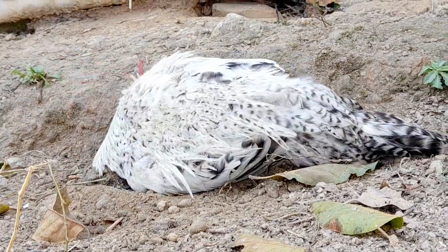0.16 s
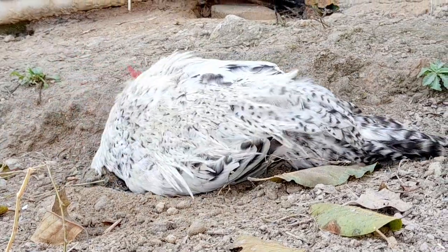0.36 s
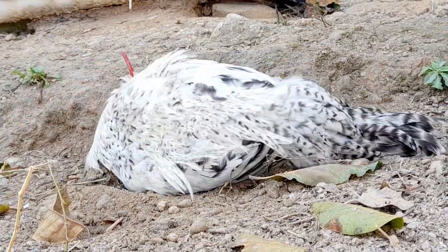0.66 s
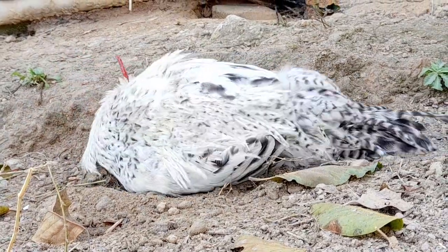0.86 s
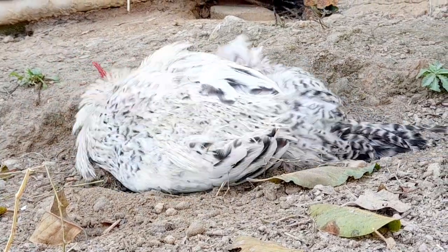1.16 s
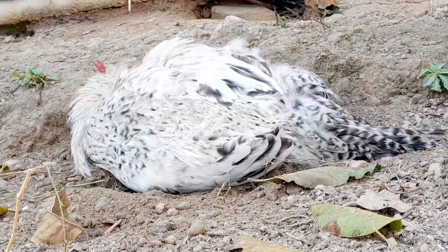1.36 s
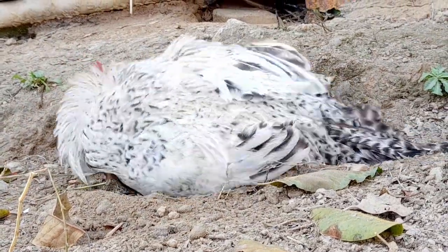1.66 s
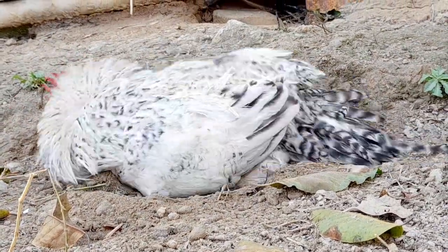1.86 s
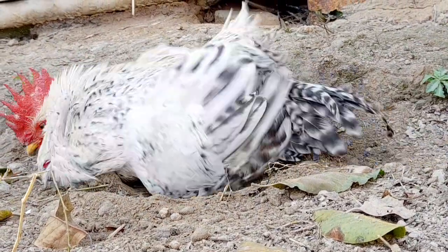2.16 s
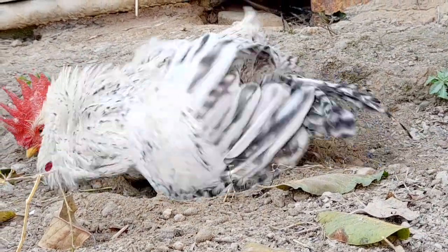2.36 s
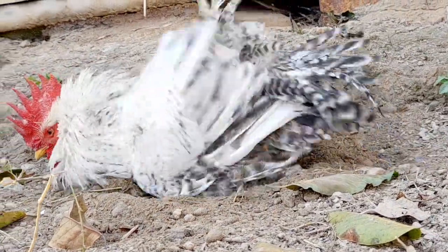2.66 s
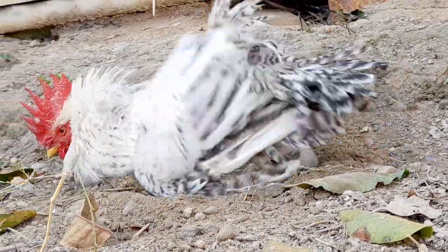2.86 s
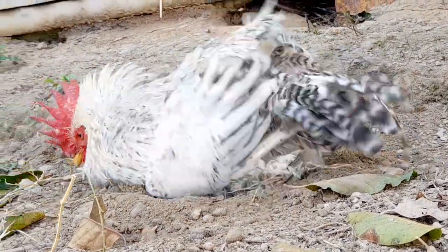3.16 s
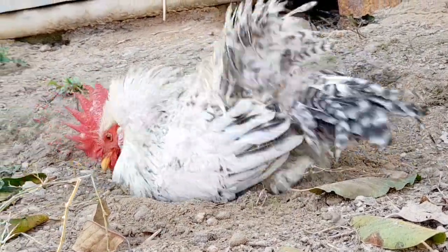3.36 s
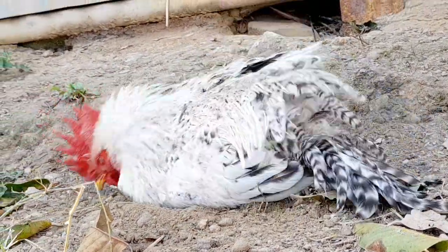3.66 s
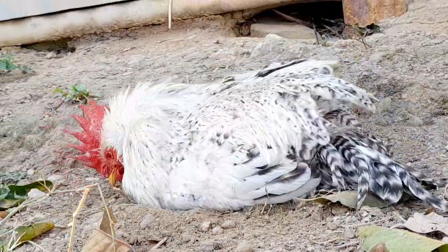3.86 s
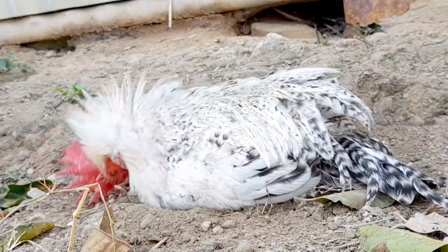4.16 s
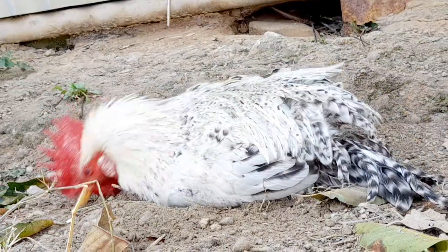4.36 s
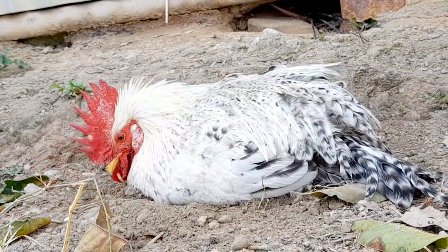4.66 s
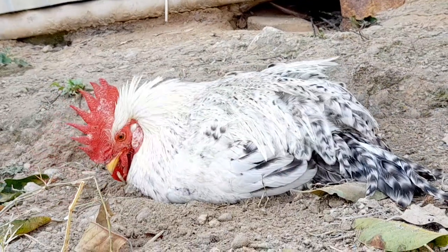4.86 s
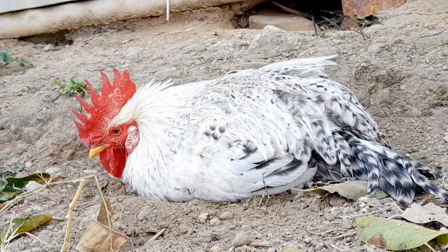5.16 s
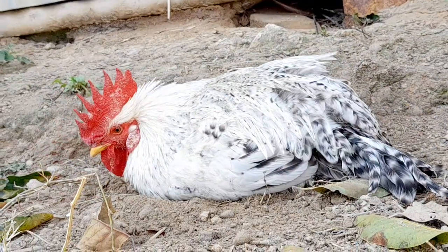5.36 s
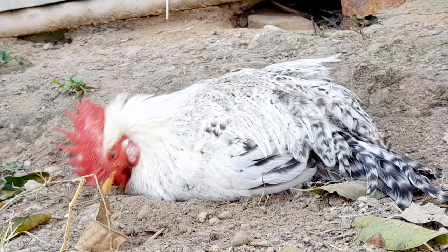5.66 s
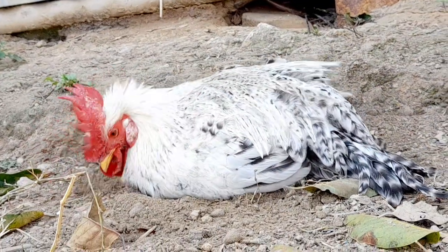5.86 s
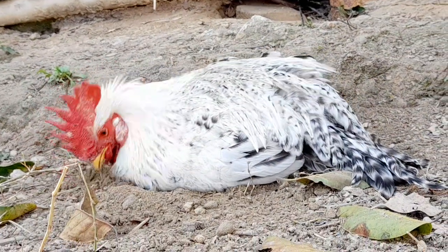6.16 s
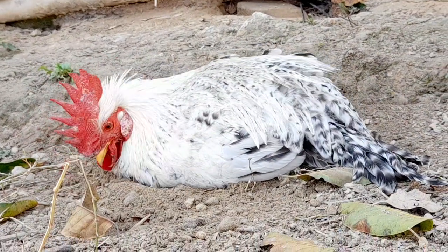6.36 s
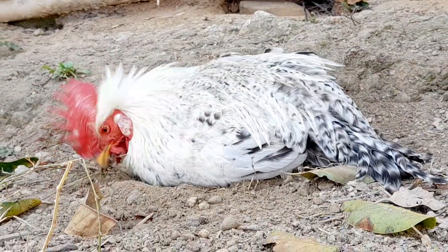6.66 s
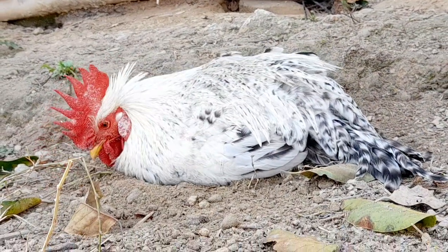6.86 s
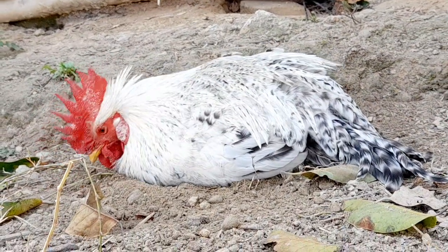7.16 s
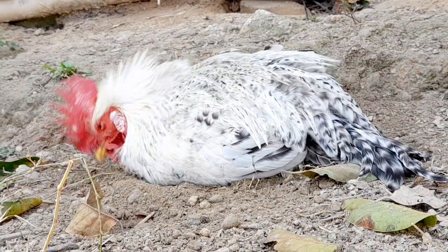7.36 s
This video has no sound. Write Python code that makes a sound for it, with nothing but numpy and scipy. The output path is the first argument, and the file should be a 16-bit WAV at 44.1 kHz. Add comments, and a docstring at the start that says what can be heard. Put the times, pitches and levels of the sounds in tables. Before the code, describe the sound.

Outdoors in a yard, wind softly buffets the left side of the microphone while small birds cheep on the right. Around two seconds a rooster rattles its stiff feathers, scrapes dry soil and sprays sand, then shudders again. Crumbs and grit patter down and settle. Hoarse scolding and lively cheeping continue, with distant whistles and faint hens over a low rumble.

```python
"""A low outdoor rumble and faint hiss, a breeze buffeting the left microphone port, and bird calls around.
Birds whistle and hens call far off; small birds cheep and scold to the right, in front of a wall.
A rooster takes a dust bath: he shudders his wings and kicks dry soil over himself, and crumbs patter down.
Calls are harmonics on gliding pitches; wind, soil and sand are filtered noise and clicks under envelopes,
and the feathers are resonances driven by flicks and rubbing noise."""
import sys
import numpy as np
from scipy import signal
from scipy.fft import rfft, irfft
from scipy.io import wavfile
from scipy.ndimage import map_coordinates

SR = 44100
rng = np.random.default_rng(int(sys.argv[2]) if len(sys.argv) > 2 else 0)


def store_pcm(level_fs):
    """Save levels as 16-bit WAV."""
    pcm = np.round(np.clip(level_fs, -1, 1) * 32767).astype(np.int16)
    wavfile.write(sys.argv[1], SR, np.atleast_2d(pcm).T)


N = 330750  # samples, 7.5 s
T = np.arange(N) / SR  # s


def undb(db):
    """Decibels to gain."""
    return 10 ** (np.asarray(db) / 20)


def unit(x):
    """Scale to rms 1."""
    return x / np.sqrt(np.mean(x ** 2) + 1e-18)


def pan(x, db):
    """Place a sound by its left minus right level, keeping the mean power."""
    return unit(undb([[db / 2], [-db / 2]])) * x


def add(out, s, x):
    """Mix x into out from time s."""
    i = int(s * SR)
    out[..., i:i + x.shape[-1]] += x[..., :N - i]


def shape(x, points):
    """Filter by a spectrum of (f/Hz, level/dB), interpolated over log frequency."""
    hz, db = np.transpose(points)
    f = np.maximum(np.fft.rfftfreq(N, 1 / SR), 1)
    return irfft(rfft(x) * undb(np.interp(np.log(f), np.log(hz), db)), N)


def colour(x, points):
    """Filter by a spectrum of (f/Hz, level/dB), then scale to rms 1."""
    return unit(shape(x, points))


def ring(x, hz, width):
    """One resonance, gain 1 at its centre."""
    return signal.lfilter(*signal.iirpeak(hz, hz / width, SR), x)


def wander(n, rate):
    """Smooth chance with spread near 1 that changes rate times a second."""
    at = np.arange(n) * rate / SR
    return map_coordinates(rng.standard_normal(4096), [at], order=2, mode="wrap")


def grains(rate, spread_db):
    """Random clicks of very unequal size, rate of them a second on average."""
    chance = rng.random(N)
    size = np.minimum(rng.exponential(size=N), 5)
    sign = rng.standard_normal(N)
    return (chance < rate / SR) * undb(spread_db * size) * sign


def envelope(s, length, attack_s, release_s):
    """Rises from time s, holds until its length is over, then dies away."""
    rise = np.clip((T - s) / attack_s, 0, 1)
    return rise * np.exp(-np.maximum(T - s - length, 0) / release_s)


def contour(length, values):
    """A smooth line through values spread evenly over a note."""
    at = np.linspace(0, len(values) - 1, int(length * SR))
    return map_coordinates(np.array(values, float), [at], order=2, mode="nearest")


def voice(hz, partials_db, jitter, jitter_hz):
    """Harmonics of a pitch contour that trembles at random; rms 1."""
    phase = 2 * np.pi * np.cumsum(hz * (1 + jitter * wander(len(hz), jitter_hz))) / SR
    # harmonics above half the sample rate stay silent
    return unit(sum(undb(db) * np.sin(k * phase) * (k * hz < SR / 2) for k, db in enumerate(partials_db, 1)))


def slurs(rows, partials_db, jitter, jitter_hz):
    """Soft calls that glide from one pitch to another."""
    out = np.zeros(N)
    for s, length, start_hz, end_hz, db in rows:
        note = voice(contour(length, [start_hz, end_hz]), partials_db, jitter, jitter_hz)
        add(out, s, note * contour(length, [0.068, 0.95, 0.77, 0.89, 0.059]) * undb(db))
    return out


def yard_echo(x, early_db, early_t60, late_db, late_t60):
    """Ground and wall scatter the sound at once; buildings add a faint tail, unlike at each port."""
    t = T[:SR // 2]
    early, late = rng.standard_normal((2, 2, len(t))) * (t > .002)
    tails = [early * undb(-60 * t / early_t60), late * undb(-60 * t / late_t60)]
    response = sum(undb(db) * h / np.linalg.norm(h, axis=1, keepdims=True)
                   for db, h in zip((early_db, late_db), tails))
    return signal.fftconvolve(x, response, axes=1)[:, :N]


# spectra of the open air: (f/Hz, relative level/dB per Hz)
RUMBLE = [(25, -42), (42, -6), (59, -4.5), (85, -1.5), (140, -0.5), (200, -1), (285, -0.5), (340, -12),
          (480, -17), (750, -23.5), (1000, -24.5), (1400, -50), (2200, -61.5)]
HISS = [(500, 8.5), (1000, 4), (1500, 4.5), (2400, 7), (3200, 4), (4100, 5), (5200, 1), (6300, -0.5),
        (8000, -15), (10000, -9), (13500, -11), (15500, -14)]
# slow swell of the rumble: (t/s, level/dB before the rumble gain)
SWELL = [(3.3, -58.5), (4.25, -55), (4.61, -57.5), (4.77, -57), (5.18, -58.5), (5.62, -55), (6.24, -61),
         (7.1, -56)]


def outdoors(rumble_db=3, hiss_db=-64.0, waver_db=1):
    """Far rumble, nearly alike at both ports, swells and wavers under a faint diffuse hiss."""
    rumble = colour(rng.standard_normal(N) + 0.41 * rng.standard_normal((2, N)), RUMBLE)
    hiss = colour(rng.standard_normal((2, N)), HISS)
    swell_db = np.interp(T, *np.transpose(SWELL)) + waver_db * wander(N, 12)
    return undb(rumble_db + swell_db) * rumble + undb(hiss_db + wander(N, 12)) * hiss


# spectrum of wind on a port: (f/Hz, relative level/dB per Hz)
BUFFET = [(20, -40), (36, -6), (55, 5), (110, 1.5), (190, -12), (280, -30.5), (500, -30), (1200, -39),
          (4000, -58)]
# spells of breeze: (t/s, length/s, level/dB before the breeze gain)
BREEZES = [(0.038, 1.98, -54.5), (7.137, 0.46, -58.5)]
BREEZE_ATTACK_S, BREEZE_RELEASE_S, TURBULENCE_DB, TURBULENCE_HZ = .08, 0.22, 4.5, 16
# gusts that thump on the port: (t/s, length/s, level/dB before the gust gain, eddy f/Hz)
GUSTS = [(.212, 0.027, -37.5, 117), (0.27, 0.27, -50.5, 86), (0.833, 0.055, -48, 72),
         (0.92, 0.17, -41, 186), (1.295, 0.021, -39.5, 80), (1.412, 0.11, -49, 80),
         (1.575, 0.024, -42, 133), (1.645, 0.037, -44.5, 68), (1.898, 0.03, -36.5, 85),
         (2.372, 0.039, -48, 60), (2.48, 0.11, -51, 65), (7.357, 0.025, -53, 55),
         (7.46, 0.049, -45.5, 55.5)]
GUST_ATTACK_S, GUST_RELEASE_S = 0.017, 0.012


def wind(breeze_db=4, gust_db=2, pan_db=20, eddy_db=-2):
    """Turbulence thumps on the left port, barely on the right; gusts shed eddies, each port has its own swirl."""
    buffet = colour(rng.standard_normal((2, N)), BUFFET)
    breeze = sum(undb(db) * envelope(s, length, BREEZE_ATTACK_S, BREEZE_RELEASE_S) for s, length, db in BREEZES)
    out = undb(breeze_db + TURBULENCE_DB * wander(N, TURBULENCE_HZ)) * breeze * buffet
    swirl = rng.standard_normal((2, N))
    for s, length, db, hz in GUSTS:
        eddy = undb(eddy_db) * unit(ring(ring(swirl, hz, 51), hz, 82))
        gust = undb(db + gust_db) * envelope(s, length, GUST_ATTACK_S, GUST_RELEASE_S)
        out += gust * (buffet + eddy)
    return pan(out, pan_db)


def flock(level_db=-70, spread_db=3, count=45):
    """More birds twitter faintly in the distance, at random times and pitches, to the right."""
    rows = [(a * T[-1], 0.043 * (1 + b), 3300 + 2200 * c, 3300 + 1800 * d, level_db + spread_db * (2 * e - 1))
            for a, b, c, d, e in rng.random((count, 5))]
    return pan(slurs(rows, [0], 0.041, 1120), -20)


# distant hens: (t/s, length/s, start f/Hz, end f/Hz, level/dB relative to each other)
HENS = [(5.48, 0.14, 248.3, 284.5, -63.5), (5.5, 0.23, 256.6, 247.5, -68.5), (6.57, 0.23, 305, 285.5, -70),
        (7.24, 0.3, 344.3, 399.7, -67.5), (7.32, 0.2, 425, 460, -64.5)]
# the throat of a hen: (f/Hz, relative level/dB)
THROAT = [(200, -40), (420, 12), (560, 6), (760, 8.5), (860, -8), (1000, -3), (1300, -15), (1700, -1),
          (2300, -41), (4000, -62)]


def hens(level_db=-74):
    """Hoarse drawn-out calls, shaped by the throat."""
    calls = slurs(HENS, [0] * 7, 0.038, 200.7)
    return pan(undb(level_db) * colour(calls, THROAT), 0.64)


# slurred whistles of birds further off: (t/s, length/s, start f/Hz, end f/Hz, level/dB before far mix)
WHISTLES = [(.095, 0.036, 3040, 2500, -58.5), (.185, 0.039, 3130, 2320, -56),
            (.25, 0.037, 2320, 2750, -57.5), (.305, .04, 2580, 3020, -58.5), (.38, 0.035, 3100, 2390, -68),
            (.55, 0.049, 2264, 2490, -65), (.85, 0.19, 1060, 1036, -71), (2.14, 0.057, 2310, 2610, -52),
            (2.412, 0.076, 2896, 2163, -49.5), (2.455, .05, 4030, 3840, -54.5),
            (3.13, 0.052, 4150, 4460, -60.5), (3.685, 0.033, 3820, 4570, -59),
            (4.48, 0.039, 4340, 3940, -60.5), (4.53, 0.026, 3770, 4300, -61), (4.5, 0.078, 2350, 2234, -66),
            (4.66, 0.084, 2150, 2245, -66), (4.93, 0.12, 1332, 1326, -71),
            (5.095, 0.042, 2600, 2375, -56.5), (5.15, 0.094, 2234, 2604, -63.5),
            (6.29, 0.13, 2400, 2020, -70), (6.51, 0.032, 3560, 4690, -55.5), (6.98, 0.016, 3420, 4370, -52),
            (7.403, 0.046, 3860, 4780, -57)]


def whistles():
    """Gliding, nearly pure tones with a weak octave."""
    return pan(slurs(WHISTLES, [0, -28], 0.0365, 903), -2.6)


# thin arched peeps: (t/s, length/s, level/dB before gain)
PEEPS = [(0.058, 0.075, -47.5), (0.279, 0.05, -47), (1.253, 0.076, -45.5), (1.668, 0.084, -48),
         (2.355, 0.067, -49), (3.956, 0.062, -43), (6.404, 0.072, -51), (6.887, 0.07, -45),
         (7.309, 0.072, -52.5)]


def peeps(gain_db=-3, pan_db=-8, jitter=0.074):
    """Notes that climb and sink; a faint octave sounds at the onset and again later, strongest as they sink."""
    out = np.zeros(N)
    for s, length, db in PEEPS:
        pitch = contour(length, [3500, 3900, 5430, 5620, 5230, 4420])
        low = voice(pitch, [0], jitter, 1500)
        octave = voice(pitch, [-60, 0], jitter / 2, 1500)
        note = low * contour(length, [0.23, 1.0, 0.96, 0.31, 0.35, 0.24, 1])
        note += octave * contour(length, [0.12, 0.0, 0.065, 0.14, 0.16, 0.22, 0.0])
        add(out, s, note * undb(db + gain_db))
    return pan(out, pan_db)


def far_calls(direct_db=-5):
    """Peeps, twitter, whistles and hens, with more echo than direct sound."""
    calls = peeps() + flock() + whistles() + hens()
    return undb(direct_db) * calls + yard_echo(calls, early_db=4.5, early_t60=0.17, late_db=-2, late_t60=0.6)


# short scolding rasps: (t/s, length/s, f/Hz, level/dB before gain)
RASPS = [(1.609, .032, 4190, -53.5), (2.558, 0.016, 3390, -48), (2.618, 0.017, 3097, -39),
         (2.694, 0.025, 2986, -39), (3.647, 0.041, 4840, -52), (3.701, 0.045, 4460, -52),
         (3.757, 0.04, 4530, -48), (3.825, 0.028, 4650, -48), (3.899, 0.046, 4690, -48),
         (4.057, 0.049, 4660, -43.5), (4.231, 0.035, 4700, -47.5), (4.306, 0.051, 4700, -49.5),
         (4.391, .05, 4680, -49), (4.864, 0.049, 4710, -59.5), (4.929, 0.048, 5200, -60),
         (5.01, 0.037, 4680, -55.5), (5.141, 0.091, 5010, -60), (5.364, .041, 5440, -57)]
RASP_PAN_DB = -9.5  # left minus right


def rasps(gain_db=-2, octave_db=4):
    """Hoarse notes: low ones carry on the octave, high ones smear in pitch; the beak dulls their top."""
    out = np.zeros((2, N))
    for s, length, hz, db in RASPS:
        second_db = np.interp(hz, [3100, 3500], [octave_db, -11])
        jitter = np.interp(hz, [3100, 4400], [.09, .21])
        note = voice(hz * contour(length, [0.88, 1.02, 1, 0.85]), [0, second_db, -27], jitter, 2500)
        note *= contour(length, [0.96, 0.86, 0.9, 0.45, 0.84, 0.41])
        add(out, s, pan(note * undb(db + gain_db), RASP_PAN_DB))
    return signal.sosfilt(signal.butter(4, 11500, fs=SR, output="sos"), out)


# two-voiced cheeps: (t/s, length/s, nominal crest f/Hz, level/dB before gain, roughness 0-1)
CHEEPS = [(0.154, 0.071, 4146, -46, 0.74), (.234, 0.031, 3790, -47, 0.8), (0.355, 0.067, 3970, -45.5, 0.72),
          (0.434, 0.069, 3955, -47, 0.38), (0.545, 0.058, 4070, -44.5, 0.3),
          (1.265, 0.062, 3964, -40.5, 0.2), (1.36, 0.1, 3990, -39.5, 0.39), (1.667, .068, 4017, -37, 0.37),
          (1.785, .086, 4190, -37.5, 0.38), (1.93, 0.1, 4063, -39.5, .4), (2.347, 0.041, 3920, -50, 0.45),
          (3.271, 0.07, 3790, -41.5, 0.24), (3.969, 0.06, 3876, -36, 0.34),
          (4.122, 0.067, 4110, -36.5, 0.27), (4.601, 0.062, 3834, -43.5, 0.38),
          (4.74, 0.082, 4010, -43, 0.2), (5.266, 0.073, 3960, -40.5, 0.39), (5.399, 0.09, 3980, -43, 0.47),
          (5.519, 0.077, 4043, -35, 0.33), (5.638, .071, 4115, -34, 0), (5.78, .07, 4090, -39.5, 0.12),
          (5.902, 0.07, 4100, -40.5, 0.18), (6.033, .075, 4170, -40.5, 0.23),
          (6.149, 0.072, 4040, -41.5, 0.11), (6.609, 0.054, 4150, -47, 0.34),
          (6.702, 0.051, 4290, -42, 0.1), (6.797, 0.049, 4260, -41.5, 0.25), (6.898, 0.051, 4220, -41, 0.1),
          (6.991, 0.071, 4055, -46.5, 0.19), (7.386, 0.093, 3980, -55, 0.16)]
CHEEP_PAN_DB = -12.5  # left minus right


def cheeps(buzz_hz=520, buzz_depth=0.37, buzz_swing=0.032, flick_db=-2, flick_s=.024, gain_db=-2,
           echo_db=-7, hoarse_echo_db=12):
    """One side of the syrinx sings a buzzing arch on its second harmonic; the other flicks upward at the start.
    Gives the direct sound and the share sent to the walls, which is larger for the hoarse birds further back."""
    direct, sent = np.zeros((2, 2, N))
    for s, length, hz, db, rough in CHEEPS:
        pitch = hz / 2 * contour(length, [0.89, .92, .96, 1.01, 1.01, .88, 0.67])
        # no two cheeps are alike: each bends a little in its own way
        pitch *= 1 + 0.0269 * wander(len(pitch), 93.0)
        # the buzz shakes both pitch and level, and spreads the note into close sidebands
        buzz = np.sin(2 * np.pi * np.cumsum(buzz_hz * (1 + 0.15 * wander(len(pitch), 294))) / SR)
        buzzing_pitch = pitch * (1 + buzz_swing * buzz)
        note = voice(buzzing_pitch, [-17, 7, -16, -25.0, -21, -36], 0.02 + 0.0945 * rough, 1500)
        note *= (1 + buzz_depth * buzz) * contour(length, [0.059, 0.28, 0.98, 1.0, 1, 0.47, 0.058])
        sweep = hz * contour(flick_s, [1.04, 1.22, 1.34, 1.4])
        flick = voice(sweep / 4, [-50, -11, 2, 11, 1.5, -44, -12, -6], 0.049 + 0.095 * rough, 1855)
        add(note, 0, undb(flick_db) * flick * contour(flick_s, [0.35, 0.44, 0.29, 0.44, 0.64, 0.22, 0]))
        note = pan(note * undb(db + gain_db), CHEEP_PAN_DB)
        add(direct, s, note)
        add(sent, s, note * undb(echo_db + hoarse_echo_db * rough))
    return direct, sent


# colour of the near birds as it reaches the ports: (f/Hz, level/dB)
BIRD_COLOUR = [(1700, 1), (2500, 1), (4200, -1.5), (6200, 3), (8000, -5), (10300, -0.5), (13000, -8)]


def near_birds():
    """Cheeps and scolding, direct and scattered by the yard."""
    direct, sent = cheeps()
    scolding = rasps()
    echo = yard_echo(sent + scolding, early_db=1, early_t60=0.12, late_db=-6.0, late_t60=0.79)
    return shape(direct + scolding + echo, BIRD_COLOUR)


# clods and claws hitting the ground: (t/s, peak level/dB before gain, f/Hz)
CLODS = [(2.527, -43, 400), (2.579, -42, 353), (2.729, -40.5, 353), (2.763, -44, 358), (2.789, -38, 673),
         (2.974, -52, 435), (3.051, -47, 433), (3.32, -44.5, 353)]
# grit striking dry leaves: (t/s, peak level/dB before gain)
GRIT = [(2.343, -29), (2.5255, -39), (3.228, -40.5), (3.3733, -30), (3.7326, -38), (3.7867, -35),
        (5.6, -37), (6.662, -46)]


def patter(clod_db=5, grit_db=4, clod_s=0.0019, grit_s=0.00035):
    """Dull knocks of clods and bright ticks of grit: short noise bursts through resonances."""
    out, t = np.zeros((2, N)), T[:2048]
    for s, db, hz in CLODS:
        knock = ring(rng.standard_normal(len(t)) * np.exp(-t / clod_s), hz, 310)
        add(out, s, pan(knock / abs(knock).max() * undb(db + clod_db), 0.88))
    for s, db in GRIT:
        burst = rng.standard_normal((2, len(t))) * np.exp(-t / grit_s)
        tick = ring(ring(burst, 4000, 6500), 5400, 5700)
        add(out, s, tick / abs(tick).max() * undb(db + grit_db))
    return out


# port balance, more highest treble left, more presence right: (f/Hz, left minus right level/dB)
PORTS = [(1300, 17.5), (2400, -7), (4400, -5.5), (8000, 2.5), (11000, 1.5), (14000, 24.5)]


def ports(x):
    """Colour a near sound as the two microphone ports hear it."""
    hz, db = np.transpose(PORTS)
    tilt = np.interp(np.log(np.fft.rfftfreq(N, 1 / SR) + 1), np.log(hz), db)
    return irfft(rfft(x) * undb(np.array([tilt, -tilt]) / 2), N)


# resonances of the stiff feathers, each passed twice: (f/Hz, width of one pass/Hz, relative level/dB)
QUILL = [(1877, 330, 11.5), (2280, 200, 5.5), (3100, 540, 3.5), (3970, 220, -10), (4690, 380, 4.5),
         (5940, 220, -1.5), (7000, 880, -1.5)]
# extra quill flicks, one soft and one hard: (t/s, relative level/dB)
EXTRA_FLICKS = [(2.982, -1), (3.094, 15.5)]
SLOWING_PER_S = 0.58  # share of its starting speed that the tiring wing loses each second, down to half


def quills(start, start_rate, share, rattle_db=4, flick_spread_db=2):
    """Stiff feathers flick past each other, ever more slowly, and rub in between; both ring the shafts."""
    rate = start_rate * np.clip(1 - SLOWING_PER_S * (T - start), .5, 1)
    share = np.clip(share, 0, 1)
    phase = np.cumsum(rate * (1 + 0.13 * wander(N, 50))) / SR
    # one click each time the phase completes a turn
    turns = np.floor(phase - phase[int(start * SR)])
    clicks = np.diff(turns, prepend=turns[0]) * undb(flick_spread_db * wander(N, 110))
    for s, db in EXTRA_FLICKS:
        add(clicks, s, undb([db]) / 2)
    decay = np.exp(-T[:256] / .0008)
    flicks = signal.lfilter(decay / np.linalg.norm(decay), 1, clicks * np.sqrt(SR / rate))
    rub = rng.standard_normal(N) + 4.3 * rng.standard_normal((2, N))
    push = np.sqrt(share * flicks ** 2 + 1 - share) * rub
    shafts = sum(undb(db) * ring(ring(push, hz, width), hz, width) for hz, width, db in QUILL)
    return undb(rattle_db) * unit(shafts)


# wing shudders: (t/s, length/s, rattle level/dB, fanned air level/dB, quills flicked a second at the start,
# share of the rattle in sharp flicks 0-1); levels before layer gains
SHUDDERS = [(1.943, 0.37, -51, -57.5, 87, 0.03), (2.827, 0.21, -49.5, -48.5, 56, 0.47)]
SHUDDER_ATTACK_S, SHUDDER_RELEASE_S, AIR_RELEASE_S = 0.032, 0.066, 0.11
WING_SOIL_DB, WING_SAND_DB = -2.5, -3  # stirred up, relative to the rattle before layer gains
# kicks of the legs: (t/s, length/s, scraped soil level/dB, thrown sand level/dB); levels before layer gains
KICKS = [(2.3, 0.16, -57, -55), (2.497, 0.075, -54, -52.5), (2.597, 0.048, -60.5, -53.5),
         (2.71, 0.068, -54.5, -53.5), (2.922, 0.15, -54.5, -53.5), (3.182, 0.062, -60.5, -56.5),
         (3.285, 0.053, -64, -60.5)]
KICK_ATTACK_S, KICK_RELEASE_S, KICK_AIR_DB = 0.015, 0.072, 1  # air relative to scrape before layer gains
SETTLE_S, SETTLE_DB = 0.33, -12.5  # the thrown sand trickles back down
# spectra of soil, sand and fanned air: (f/Hz, relative level/dB per Hz)
SOIL = [(200, 1.5), (400, 6), (750, 3), (1100, -1.5), (1400, -6), (2500, -9), (5000, -13), (8000, -38)]
SAND = [(2000, -20), (3800, 12), (6000, 4), (8000, 0.5), (10500, 6), (13500, -0.5), (15500, -14)]
FANNING = [(60, -26), (120, 6), (160, 12.5), (210, 9), (260, 8), (380, -4), (600, -44)]


def bath(soil_db=2, sand_db=2, fan_db=0, surge_db=1.0):
    """Shudders rattle the quills; shudders and kicks scrape soil, spray sand and fan the air; their powers add."""
    rattle = 0
    scrape, spray, fan = np.zeros((3, N))  # powers
    for s, length, db, air_db, rate, share in SHUDDERS:
        wing = undb(db) * envelope(s, length, SHUDDER_ATTACK_S, SHUDDER_RELEASE_S)
        rattle = rattle + wing * quills(s, rate, share)
        scrape += (undb(WING_SOIL_DB) * wing) ** 2
        spray += (undb(WING_SAND_DB) * wing) ** 2
        fan += (undb(air_db) * envelope(s, length, SHUDDER_ATTACK_S, AIR_RELEASE_S)) ** 2
    for s, length, scrape_db, spray_db in KICKS:
        leg = envelope(s, length, KICK_ATTACK_S, KICK_RELEASE_S)
        falling = undb(SETTLE_DB) * envelope(s, length, length, SETTLE_S)
        scrape += (undb(scrape_db) * leg) ** 2
        spray += undb(spray_db) ** 2 * (leg ** 2 + falling ** 2)
        fan += (undb(scrape_db + KICK_AIR_DB) * leg) ** 2
    # crumbs partly shared by both ports, partly each port's own
    crumbs = grains(2500, 2.4) + 1.07 * np.array([grains(2500, 2.8), grains(2500, 2.6)])
    soil = colour(crumbs, SOIL) * undb(surge_db * wander(N, 40))
    sand = colour(np.array([grains(7000, 0.73), grains(7000, 3.8)]), SAND) * undb(1.55 * wander(N, 68))
    air = colour(rng.standard_normal(N) + 0.17 * rng.standard_normal((2, N)), FANNING)
    bright = ports(rattle + undb(sand_db) * np.sqrt(spray) * sand)
    return bright + undb(soil_db) * np.sqrt(scrape) * soil + undb(fan_db) * np.sqrt(fan) * air


def scene():
    """The open air, far calls, near birds and the bathing rooster."""
    return outdoors() + wind() + far_calls() + near_birds() + patter() + bath()


TOP_HZ = 15400


def record(dry):
    """A steep low-pass removes the treble above TOP_HZ."""
    return signal.sosfilt(signal.ellip(8, .2, 70, TOP_HZ, fs=SR, output="sos"), dry)


dry = scene()
out = record(dry)
store_pcm(out)
```